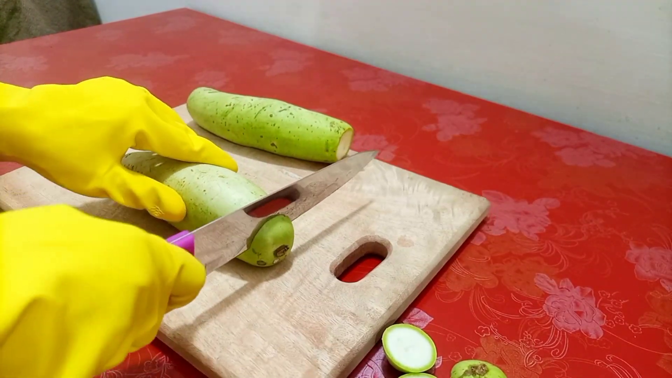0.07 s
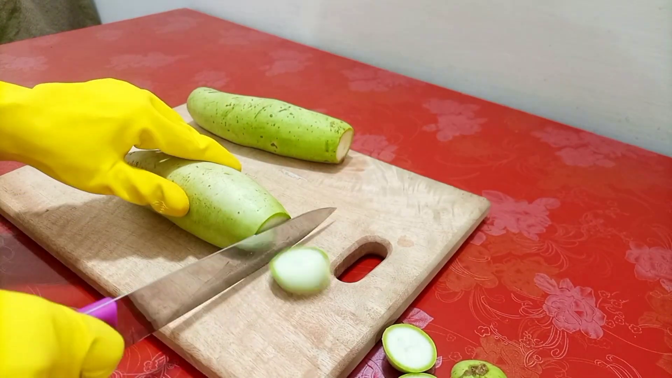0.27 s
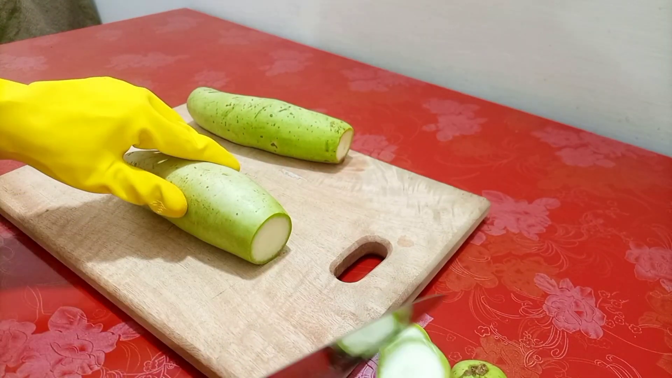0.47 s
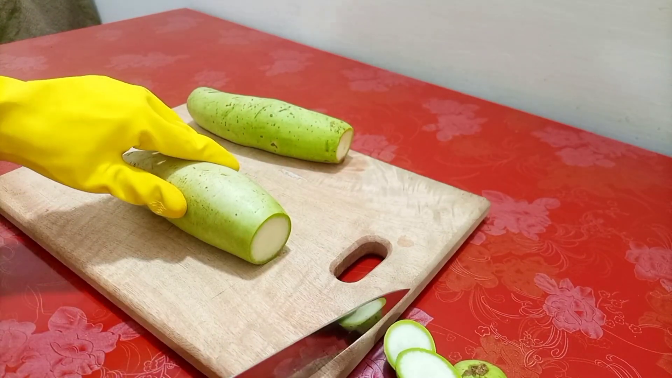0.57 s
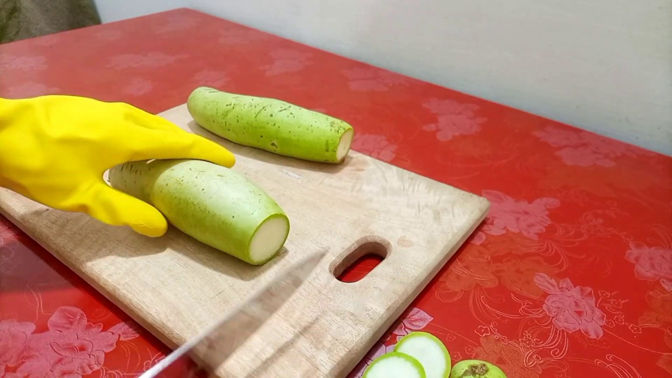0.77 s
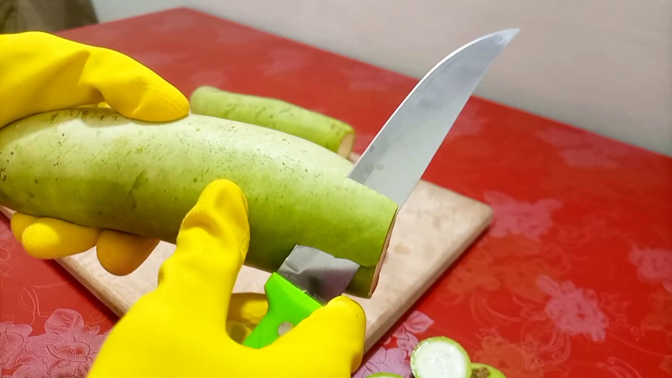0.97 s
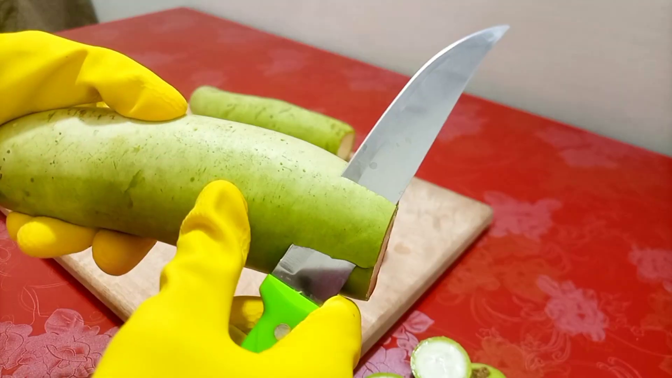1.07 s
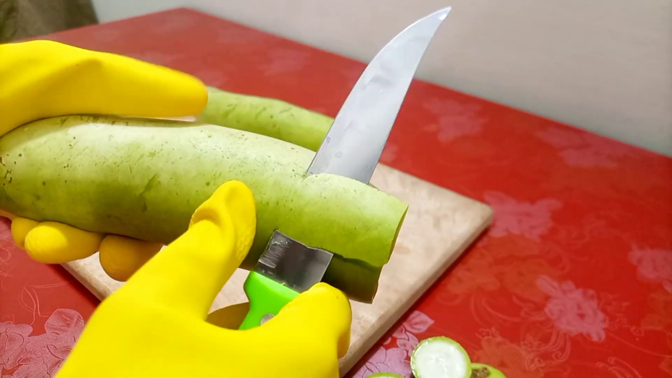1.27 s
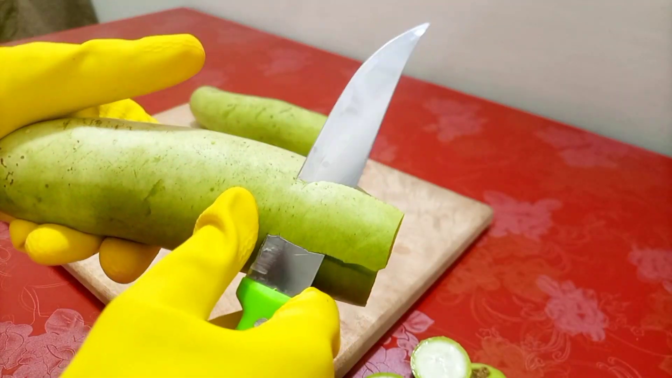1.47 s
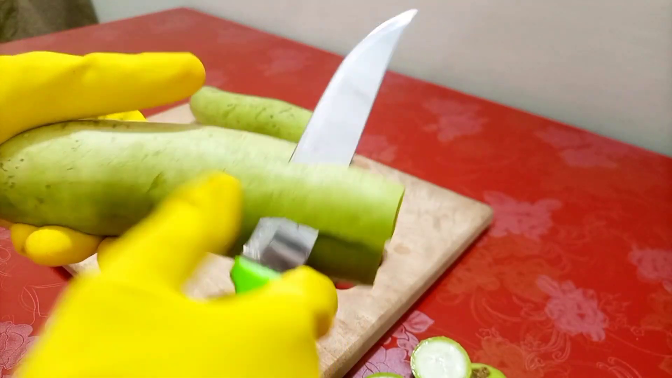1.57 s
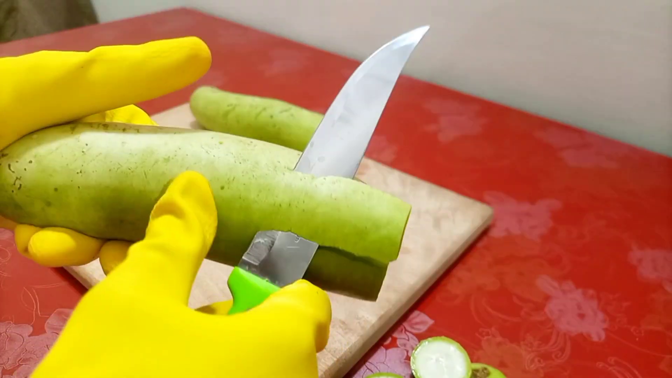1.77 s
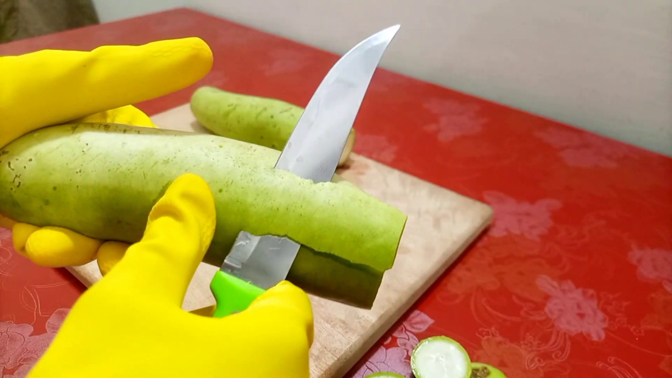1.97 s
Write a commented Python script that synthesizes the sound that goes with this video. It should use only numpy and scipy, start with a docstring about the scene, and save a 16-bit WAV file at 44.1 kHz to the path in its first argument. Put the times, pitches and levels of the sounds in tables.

```python
"""A faint wavering hum and a mottled hiss (filtered noise) lie underneath throughout.
Soft low bumps of gloved hands on a courgette, swelling sines with a dull rub, come and go from early on.
A steel knife breaks through and knocks once on a wooden board: noise bursts, ringing modes, a small room's answer.
After a thin fleck of narrow-band noise the cut slice is pushed aside with a faint squeak (a gliding tone),
then flops down (soft slaps, damped modes); a dull tick (a low-passed pulse) and two fainter, higher flecks follow."""
import sys
import numpy as np
from scipy import signal
from scipy.fft import rfft, irfft, next_fast_len
from scipy.io import wavfile
from scipy.ndimage import uniform_filter1d, map_coordinates

SR = 44100
rng = np.random.default_rng(int(sys.argv[2]) if len(sys.argv) > 2 else 0)


def master(y):
    """Save y as 16-bit WAV."""
    cut = np.clip(np.atleast_2d(y).T, -1, 1)
    pcm = np.round(cut * 32767)  # scale
    wavfile.write(sys.argv[1], SR, pcm.astype(np.int16))


N = 88200  # samples, two seconds

# Spectrum of the steady hiss: f/Hz, relative level/dB
HISS_COLOUR = [(25, -16), (60, -4.5), (110, -0.5), (180, -1.5), (250, -6), (350, 2.5), (470, -5),
               (650, -0.5), (1350, -0.5), (2300, -1.5), (3500, -3), (4600, -5.5), (5400, -16.5),
               (6300, -21), (7200, -30.5), (8500, -39), (15000, -43)]
# Small dull tick: t/s, level/dB
TICK_EVENTS = [(.8405, -42.5)]
# Faint brief hisses of narrow-band noise: t/s, level/dB, centre f/Hz, half length/s
HISS_FLECKS = [(0.435, -64, 4880, 0.022), (1.154, -84, 7800, .006), (1.903, -82, 7900, 0.0064)]
# Path of the rubbery squeak: t/s, f/Hz, level/dB
SQUEAK_PATH = [(0.464, 595, -74), (.488, 618, -59.5), (.508, 624, -70), (.520, 796, -66), (.540, 900, -65),
               (.556, 900, -80)]
# Soft bumps of hands and vegetable: t/s, level of the low swing/dB, f/Hz, half length/s
SOFT_BUMPS = [(0.103, -50.5, 100, 0.026), (0.159, -54, 85, 0.013), (.284, -38.5, 93, 0.011),
              (.390, -34.5, 114, 0.0046), (.419, -35.5, 105, 0.012), (.442, -35, 132, 0.0059),
              (0.461, -45.5, 99, 0.0095), (.558, -39.5, 101, 0.0092), (.582, -39.5, 166, 0.0059),
              (.601, -48.5, 100, 0.0098), (.672, -35, 164, 0.0043), (0.689, -42.5, 106, 0.016),
              (.778, -43, 100, 0.018), (0.851, -52, 86, 0.0083), (0.883, -41.5, 101, 0.007),
              (0.906, -36.5, 123.3, 0.01), (0.945, -50, 82, 0.015), (1.234, -48.5, 64.6, 0.009),
              (1.320, -49.5, 68, 0.012), (1.35, -49, 86, 0.0077), (1.626, -48, 63.4, .01),
              (1.808, -45, 72, 0.0086), (1.872, -50.5, 109.6, .018)]
# Spectrum of the dull rub within a bump: f/Hz, relative level/dB
RUB_COLOUR = [(30, -20), (120, -2.5), (250, -2), (320, -6), (430, -23.5), (1000, -39.5), (4000, -60.5)]
# Landings of the slice: t/s, reference level/dB
SLICE_LANDINGS = [(0.612, -37), (0.616, -36), (.6215, -31.5), (0.63, -34.5)]
# Modes of the slice on the board: f/Hz, nominal relative level/dB, t60/s
SLICE_MODES = [(117, 2, .06), (320, -8, 0.062), (612, 1, 0.046), (718, -3, .05), (1150, -13, 0.051),
               (1288, -6, .08), (1770, -17, .06), (2100, -18, 0.084)]
# Spectrum of the slaps: f/Hz, relative level/dB
SLAP_COLOUR = [(100, 2), (300, -5), (450, -11), (700, 3), (950, -8), (1300, -1), (1600, -5), (2200, -5.5),
               (2800, -20), (3500, -25), (7000, -59)]
# Spectrum of the room's answer: f/Hz, relative level/dB
ANSWER_COLOUR = [(30, -34), (90, 1.5), (200, 2), (350, 0), (800, -2), (1150, -7), (1800, -1), (2700, 0.5),
                 (3400, -4.5), (4100, -12), (5300, -20), (6000, -27), (7500, -45), (10000, -66)]
# Decay of the room's answer: f/Hz, t60/s
ANSWER_DECAY = [(100, 0.14), (500, .14), (2200, .15), (5000, 0.11), (10000, 0.071)]
# Contacts of the blade with the board: t/s, reference level/dB
BLADE_CONTACTS = [(0.2292, -44), (.2330, -16.5), (0.2356, -21)]
# Modes of the wooden board: f/Hz, nominal relative level/dB, t60/s
BOARD_MODES = [(171, -18.5, .12), (369, -8, 0.11), (524.7, -12, 0.1), (682, -9, 0.12), (755, -14, 0.11),
               (834.5, -9, 0.084), (1068, -18, 0.12), (1422, -15, .08), (1664, -14.5, 0.12),
               (1869, -21, 0.11), (2066, -16, 0.096), (2680, -15, 0.12), (2960, -13, 0.09),
               (3250, -13, 0.073)]
# Spectrum of the blade's crack: f/Hz, relative level/dB
CRACK_COLOUR = [(25, -34), (60, -19), (150, -9.5), (400, -0.5), (850, 4), (1100, -6), (1700, 1), (2500, -5),
                (3300, -2), (3950, -14), (4500, -8.5), (5300, -18.5), (6000, -33), (8000, -40),
                (15000, -52)]

HUM_HZ, HUM_DB = 301, -69.5
HUM_WAVER_HZ, HUM_WAVER_DB = 2.57, 1.2  # scale of the random drift in pitch and level
HISS_DB, HISS_PATCHY_DB = -61, 1.45
TICK_PUSH_S, TICK_EDGE_HZ = 0.002, 8500
FLECK_HALF_WIDTH_HZ = 300  # distance from the centre at which the gain halves
SQUEAK_ROUGH_RAD, SQUEAK_FLUTTER_DB = 0.45, 2.5
BUMP_ROUGH_RAD, BUMP_ROUGH_RATE = 0.39, 150.2  # phase wander, knots per second
RUB_DB = -18  # relative to the swing
SLAP_DB, SLAP_RISE_S, SLAP_T60_S = -9.5, 0.0014, 0.055
SLICE_ATTACK_S = 0.0014
ROOM_DB, ROOM_DELAY_S = -10, 0.012
CRACK_DB, CRACK_T60_S = -2, 0.034
SNAP_DB = 14.5  # single-sample impulse, relative to the contact
RING_DB, RING_ATTACK_S = -3.5, 0.00026
TOP_HZ = 15500


def amp(db):
    """Level law: decibels to amplitude gain."""
    return 10 ** (np.asarray(db) / 20)


def unit(x):
    """Normalisation to an rms of 1."""
    return x / np.sqrt(np.mean(x ** 2) + 1e-20)


def along(points, hz):
    """Linear interpolation of (f, value) points on a logarithmic frequency axis."""
    f, v = np.transpose(points)
    return np.interp(np.log(hz + 1), np.log(f + 1), v)


def since(s):
    """Elapsed time in seconds since the moment s, zero before it."""
    return np.maximum(np.arange(N) / SR - s, 0)


def swell(s, half):
    """Hyperbolic-secant envelope: a smooth rise and fall, well under half its peak one half length from s."""
    return 1 / np.cosh(np.clip(np.pi / 2 * (np.arange(N) / SR - s) / half, -20, 20))


def wobble(rate):
    """Random modulation: a spline through normal deviates, rate knots per second."""
    knots = rng.standard_normal(N // 20)
    return map_coordinates(knots, [np.arange(N) * rate / SR], mode="wrap")


def filtered(x, response):
    """Linear filtering: the spectrum of x times a response of frequency."""
    m = next_fast_len(N + SR // 2)
    spectrum = rfft(x, m) * response(np.fft.rfftfreq(m, 1 / SR))
    return irfft(spectrum, m)[:N]


def coloured(x, points):
    """Minimum-phase filtering: a causal response of energy 1 with the given spectrum."""
    size = 4096
    cepstrum = irfft(np.log(amp(along(points, np.fft.rfftfreq(size, 1 / SR)))))
    # folding the cepstrum onto positive times makes the response causal
    cepstrum[1:size // 2] *= 2
    cepstrum[size // 2 + 1:] = 0
    h = irfft(np.exp(rfft(cepstrum)))
    return signal.fftconvolve(x, h / np.linalg.norm(h))[:N]


def ring(modes, s, attack_s):
    """Modal superposition: exponentially damped sines start at s, their levels varied at random."""
    t = since(s)
    total = np.zeros(N)
    for hz, db, t60 in modes:
        level = db + rng.normal(0, 1) - 60 * t / t60
        total += amp(level) * np.sin(2 * np.pi * hz * t)
    return (1 - np.exp(-t / attack_s)) * total


def burst(s, t60):
    """Transient excitation: white noise starts at s and decays exponentially."""
    t = since(s)
    return (t > 0) * amp(-60 * t / t60) * rng.standard_normal(N)


def background():
    """Frequency and amplitude modulation make the hum waver; patchy spectral gain mottles the hiss."""
    hum = np.sin(2 * np.pi * np.cumsum(HUM_HZ + HUM_WAVER_HZ * wobble(20)) / SR)
    hum_gain = amp(HUM_DB + HUM_WAVER_DB * wobble(12.07))

    z = signal.stft(rng.standard_normal(N), nperseg=1024)[2]
    # smooth the random gain over frequency, then over time
    patches = uniform_filter1d(rng.standard_normal(z.shape), size=4, axis=0)
    patches = uniform_filter1d(patches, size=8, axis=1)
    mottled = signal.istft(z * amp(HISS_PATCHY_DB * unit(patches)), nperseg=1024)[1][:N]
    hiss = filtered(mottled, lambda hz: amp(along(HISS_COLOUR, hz)))
    return hum_gain * unit(hum) + amp(HISS_DB) * unit(hiss)


def tick():
    """Pulse through a first-order low-pass: a brief negative push with softened edges."""
    push = np.zeros(N)
    for s, db in TICK_EVENTS:
        t = since(s)
        push += amp(db) * ((t > 0) & (t < TICK_PUSH_S))
    return -filtered(push, lambda hz: 1 / (1 + 1j * hz / TICK_EDGE_HZ))


def flecks():
    """Narrow-band noise: brief thin hisses swell and fade."""
    out = np.zeros(N)
    for s, db, centre, half in HISS_FLECKS:
        noise = rng.standard_normal(N)
        grain = filtered(noise, lambda hz: 1 / (1 + ((hz - centre) / FLECK_HALF_WIDTH_HZ) ** 2))
        out += amp(db) * swell(s, half) * unit(grain)
    return out


def squeak():
    """Phase integration of a gliding pitch: a thin, unsteady rising tone as the slice is pushed away."""
    t = np.arange(N) / SR
    s, hz, db = np.transpose(SQUEAK_PATH)
    phase = 2 * np.pi * np.cumsum(np.interp(t, s, hz)) / SR
    tone = np.sin(phase + SQUEAK_ROUGH_RAD * wobble(200))
    fluttering = unit(tone * amp(SQUEAK_FLUTTER_DB * wobble(120)))
    return fluttering * np.interp(t, s, amp(db), left=0, right=0)


def bumps():
    """Compliant contact: a few uneven low swings rise and fall smoothly with a dull rub."""
    t, out = np.arange(N) / SR, np.zeros(N)
    uneven = BUMP_ROUGH_RAD * wobble(BUMP_ROUGH_RATE)
    rub = amp(RUB_DB) * coloured(rng.standard_normal(N), RUB_COLOUR)
    phases = rng.uniform(0, 2 * np.pi, len(SOFT_BUMPS))
    for (s, db, hz, half), phase in zip(SOFT_BUMPS, phases):
        swing = np.sin(2 * np.pi * hz * (t - s) + phase + uneven)
        out += amp(db) * swell(s, half) * (swing + rub)
    return out


def flop():
    """Damped impact: the moist slice lands in soft slaps; the hardest excites short hollow modes."""
    slaps = np.zeros(N)
    for s, db in SLICE_LANDINGS:
        rise = 1 - np.exp(-since(s) / SLAP_RISE_S)
        slaps += amp(db + SLAP_DB) * rise * burst(s, SLAP_T60_S)
    s, db = max(SLICE_LANDINGS, key=lambda row: row[1])
    return coloured(slaps, SLAP_COLOUR) + amp(db) * ring(SLICE_MODES, s, SLICE_ATTACK_S)


def room():
    """Reverberation: the walls answer each blade contact after a gap, each band with its own decay."""
    out = np.zeros(N + SR)
    for s, db in BLADE_CONTACTS:
        hz, t, z = signal.stft(rng.standard_normal(SR // 2), SR, nperseg=256)
        decay = amp(-60 * t / along(ANSWER_DECAY, hz)[:, None])
        tail = signal.istft(z * decay, SR, nperseg=256)[1]
        start = round((s + ROOM_DELAY_S) * SR)
        out[start:][:len(tail)] += amp(db + ROOM_DB) * tail
    return coloured(out[:N], ANSWER_COLOUR)


def chop():
    """Impact excitation: each blade contact snaps and crackles; the hardest rings the board's modes."""
    force = np.zeros(N)
    for s, db in BLADE_CONTACTS:
        force += amp(db + CRACK_DB) * burst(s, CRACK_T60_S)
        force[round(s * SR)] += amp(db + SNAP_DB)
    s, db = max(BLADE_CONTACTS, key=lambda row: row[1])
    board = amp(db + RING_DB) * ring(BOARD_MODES, s, RING_ATTACK_S)
    return coloured(force, CRACK_COLOUR) + board


def scene():
    """Superposition of the background, the soft small sounds and the knock in its room."""
    soft_sounds = tick() + flecks() + squeak() + bumps() + flop()
    return (background() + soft_sounds + room() + chop())[None]


def record(dry):
    """Band limitation: nothing passes at or above the top frequency."""
    return filtered(dry[0], lambda hz: hz < TOP_HZ)[None]


dry = scene()
out = record(dry)
master(out)
```